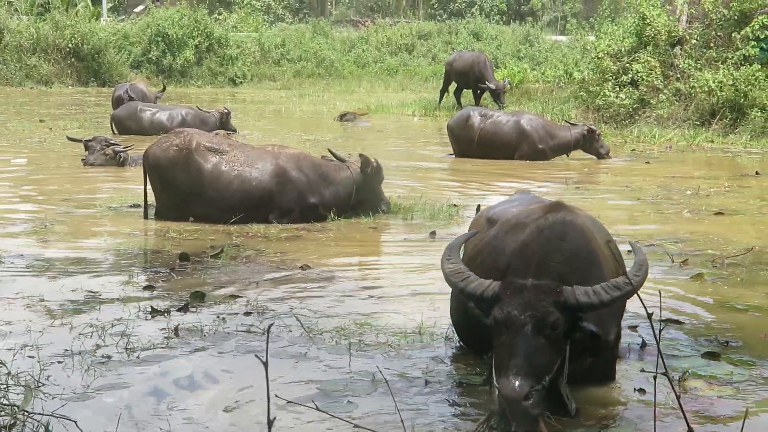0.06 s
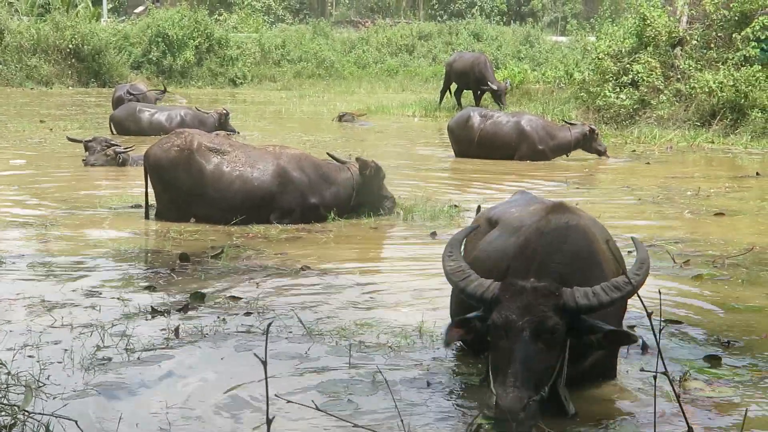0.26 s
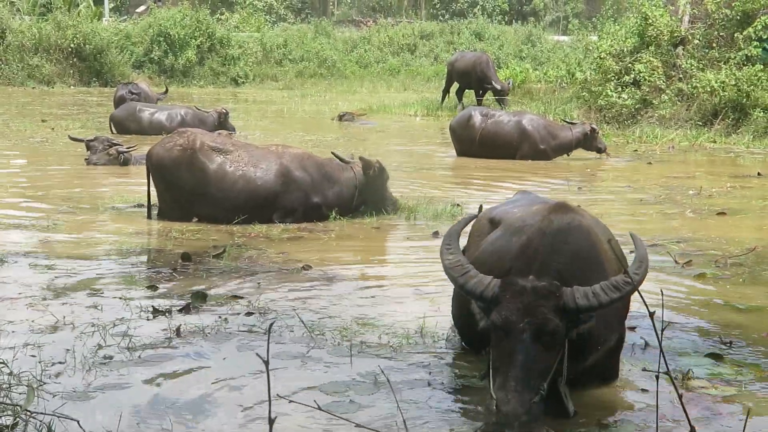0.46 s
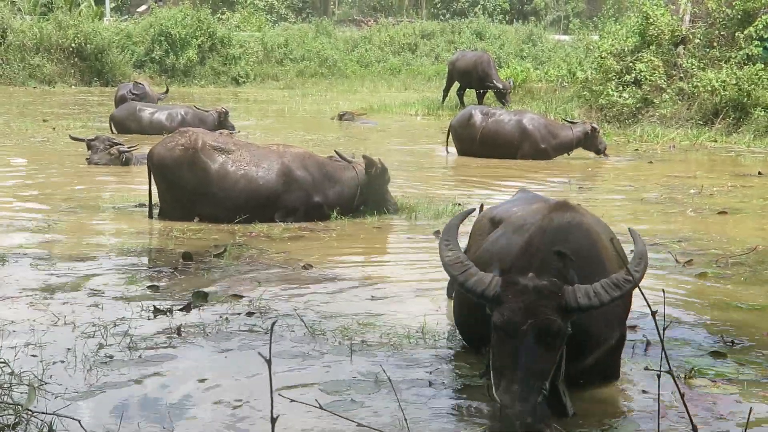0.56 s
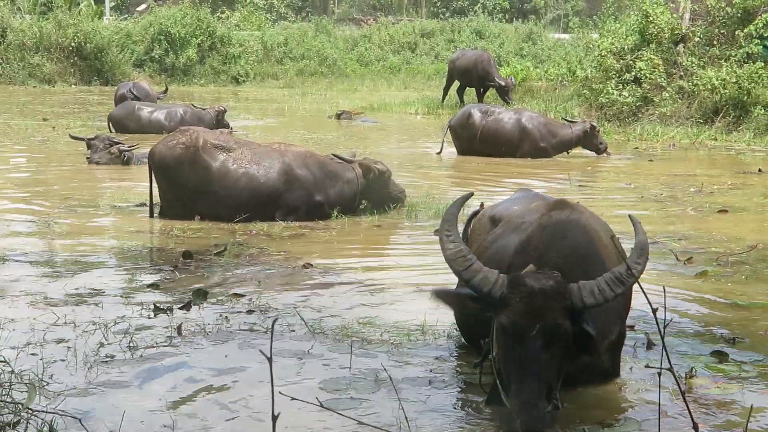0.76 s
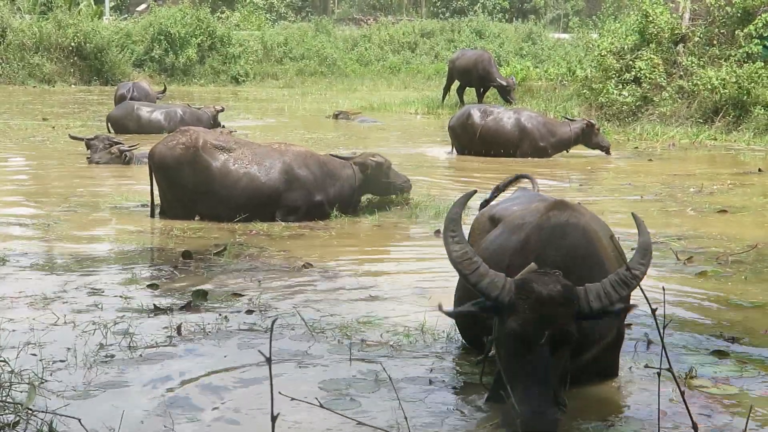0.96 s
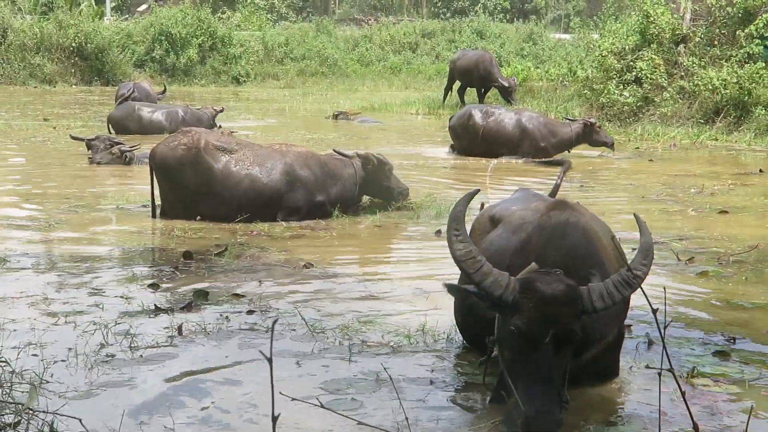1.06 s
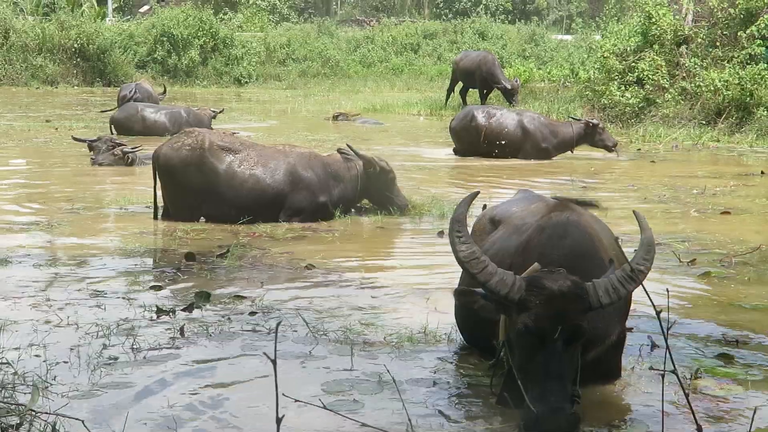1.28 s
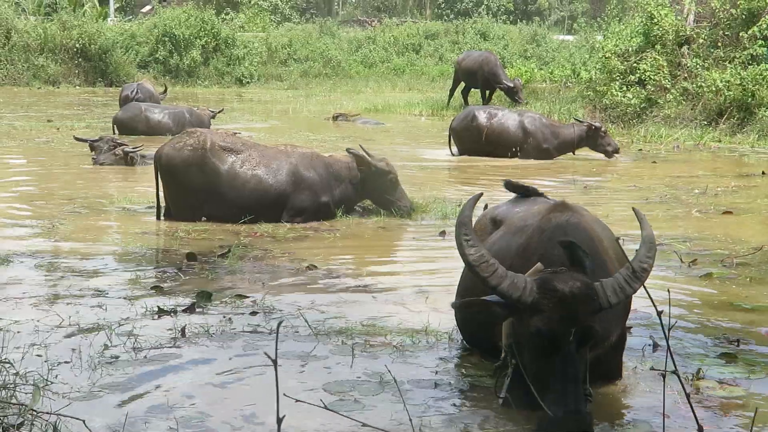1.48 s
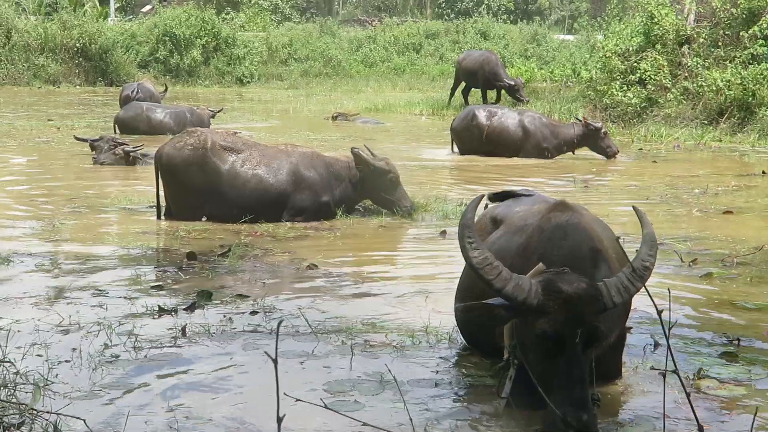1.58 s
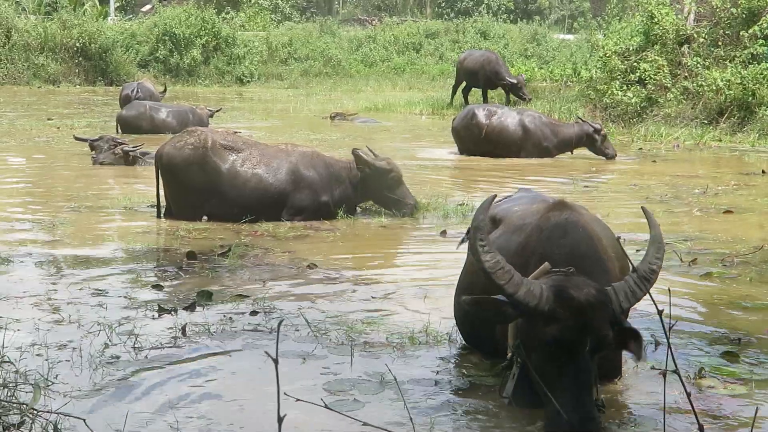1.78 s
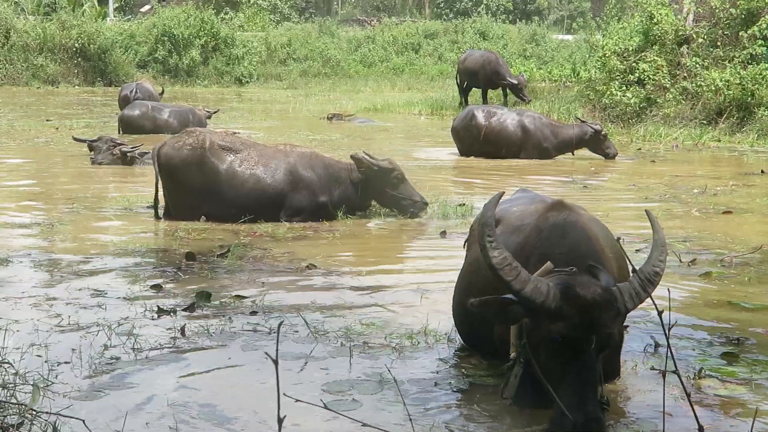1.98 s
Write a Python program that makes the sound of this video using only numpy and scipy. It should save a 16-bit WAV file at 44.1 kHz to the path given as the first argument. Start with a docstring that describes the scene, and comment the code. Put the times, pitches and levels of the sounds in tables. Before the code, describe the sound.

Buffaloes wade through shallow water, bubbling softly and then splashing, over low rumble and outdoor hiss.

```python
"""Water buffaloes wade and feed in a flooded field. From the start: low rumble, open-air hiss, a fine fizz
and small bubbles lapping at their legs. Wind puffs on the microphone's ports, a faint whistle passes,
drops and stalks snap and gentle waves wash in. A small piece of metal clinks close by, the microphone
takes a light knock, and wet grass swishes over two softer clinks. At about 1.5 s one animal plunges:
pockets of air ring in a double gulp, the water sloshes, and a spray is thrown."""
import sys
import numpy as np
from scipy import signal
from scipy.fft import rfft, irfft, next_fast_len
from scipy.io import wavfile
from scipy.ndimage import uniform_filter1d, map_coordinates

SR = 44100
rng = np.random.default_rng(int(sys.argv[2]) if len(sys.argv) > 2 else 0)


def transcribe(u):
    """Save the signal u as a 16-bit wav file named by the first command-line argument.

    u: samples, shape (n,) or (channels, n), limited to [-1, 1]; the rate is SR.
    q: integer samples, one column per channel.
    """
    v = np.clip(np.atleast_2d(u).T, -1, 1)
    q = np.round(v * 32767).astype(np.int16)
    wavfile.write(sys.argv[1], SR, q)


N = 89478


def amp(db):
    """Decibels to gain."""
    return 10 ** (np.asarray(db) / 20)


def unit(x):
    """Scale to rms 1."""
    return x / np.sqrt(np.mean(x ** 2) + 1e-20)


def along(points, hz):
    """Read a curve of (f/Hz, value) points on a log frequency axis."""
    f, values = np.transpose(points)
    return np.interp(np.log(hz + 1), np.log(f + 1), values)


def automation(rows):
    """One value per sample for each column after the time."""
    times, *columns = np.transpose(rows)
    return [np.interp(np.arange(N) / SR, times, column) for column in columns]


def wobble(rate):
    """A smooth random modulator, rate knots a second."""
    return map_coordinates(rng.standard_normal(2000), [np.arange(N) * rate / SR], mode="wrap")


def eq(x, response):
    """Filter x by a gain that depends on frequency."""
    size = next_fast_len(N + SR // 2)
    return irfft(rfft(x, size) * response(np.fft.rfftfreq(size, 1 / SR)), size)[..., :N]


def add(out, s, x):
    """Mix x into out from time s."""
    i = max(round(s * SR), 0)
    out[..., i:i + x.shape[-1]] += x[..., :max(N - i, 0)]


def stereo(pair, colour, image):
    """Two unrelated signals become left and right with a given EQ and correlation, rms 1."""
    def mid_side(hz):
        width = np.arccos(np.clip(along(image, hz), -1, 1)) / 2
        return amp(along(colour, hz)) * [np.cos(width), np.sin(width)]
    mid, side = eq(pair, mid_side)
    return unit(np.array([mid + side, mid - side]))


def patchy(depth_db):
    """Two noises with small random patches of gain in time and frequency."""
    spectra = signal.stft(rng.standard_normal((2, N)), nperseg=256)[2]
    patches = rng.standard_normal(spectra.shape[1:])
    patches = uniform_filter1d(uniform_filter1d(patches, 4, axis=0), 8, axis=1)
    return signal.istft(spectra * amp(depth_db * unit(patches)), nperseg=256)[1][:, :N]


def crackle(per_s, share):
    """Two noises with a share of their power in tiny separate ticks."""
    hits = (rng.random(N) < per_s / SR) * rng.standard_normal((2, N))
    return np.sqrt(share) * unit(hits) + np.sqrt(1 - share) * rng.standard_normal((2, N))


def envelope(rows):
    """Attack, hold and decay of each cue, summed in power."""
    t = np.arange(N) / SR
    cues = []
    for s, attack, hold, t60, db in rows:
        decay_db = 60 * np.maximum(t - s - attack - hold, 0) / t60
        cues.append(np.clip((t - s) / attack, 0, 1) * amp(db - decay_db))
    return np.linalg.norm(cues, axis=0)


RUMBLE_FADER = [(0.0, -28.5), (0.05, -37.5), (0.11, -29.5), (0.22, -38.5), (0.33, -31.5), (0.68, -34),
                (0.69, -37.5), (0.89, -32), (1.44, -34.5), (1.48, -37), (1.98, -39), (2.0, -38)]  # level ride: t/s, level/dB
RUMBLE_EQ = [(18, -44), (32, -35), (43, 0.5), (70, -2.5), (95, 3), (138, 0), (158, -4), (185, -20.5),
             (260, -49), (500, -77)]  # bass weight: f/Hz, level/dB
RUMBLE_IMAGE = [(30, .98), (80, .92), (160, .85)]  # nearly mono: f/Hz, L-R correlation
def rumble():
    """A bed of low noise, levelled and then ridden by the fader."""
    level_db, = automation(RUMBLE_FADER)
    low = stereo(rng.standard_normal((2, N)), RUMBLE_EQ, RUMBLE_IMAGE)
    power = uniform_filter1d(np.mean(low ** 2, axis=0), size=5000)
    return amp(level_db) * low / np.sqrt(np.abs(power))


AIR_MID_EQ = [(100, 2), (200, -1), (350, -1), (650, -6.5), (1150, -9), (1600, -12.5), (2300, -11),
              (4000, -14), (9000, -20), (12000, -22.5), (15800, -35.5)]  # hiss in the centre: f/Hz, level/dB
AIR_SIDE_EQ = [(25, -28), (80, -20), (200, -3), (330, -2), (650, -7), (1300, -15.5), (3000, -19.5),
               (8000, -19.5), (12000, -26), (15800, -35)]  # hiss at the sides: f/Hz, level/dB
def open_air(mid_db=-42.5, side_db=-43.5):
    """The wide, slightly restless hiss of the field."""
    mid, side = patchy(depth_db=1.07)
    mid = amp(mid_db) * unit(eq(mid, lambda hz: amp(along(AIR_MID_EQ, hz))))
    side = amp(side_db) * unit(eq(side, lambda hz: amp(along(AIR_SIDE_EQ, hz))))
    return np.array([mid + side, mid - side])


FIZZ_EQ = [(500, -11), (1800, 0), (4000, -2.5), (8000, -5), (12000, -11), (15800, -17)]  # fine grain: f/Hz, level/dB
WET_IMAGE = [(200, 0.7), (1000, 0.97), (3500, 1), (6000, 0.53), (14000, .25)]  # fizz and wet noises, wide on top: f/Hz, L-R correlation
def fine_fizz(level_db=-56):
    """A faint, fine fizz of tiny background ticks."""
    return amp(level_db) * stereo(crackle(per_s=420, share=1), FIZZ_EQ, WET_IMAGE)


def bubble(hz, swell, rise):
    """A bubble swells, rings and dies; its pitch climbs by the fraction rise per swell time."""
    t = np.arange(int(8 * swell * SR) + 2) / SR
    age = t / swell
    return age ** 2 * np.exp(2 * (1 - age)) * np.sin(2 * np.pi * hz * t * (1 + rise * age / 2))


LAP_FADER = [(0, -56.5), (.4, -48.5), (.8, -72), (1.1, -50.5), (1.45, -47), (1.65, -48.5), (1.88, -48),
             (2.03, -48.5)]  # level ride: t/s, level/dB
def lapping(per_s=700, centre_hz=1448, pitch_spread=0.6, pan_spread=0.14, swell_cycles=5.25):
    """Many small bubbles ring around the legs of the herd."""
    out = np.zeros((2, N))
    for _ in range(int(per_s * N / SR)):
        hz = centre_hz * np.exp(pitch_spread * np.clip(rng.standard_normal(), -2, 2))
        gain = amp(-2.5 * np.log(max(rng.random(), 0.03)))  # a few stand out
        pan = pan_spread * rng.standard_normal()
        ring = gain * bubble(hz, swell_cycles / hz, rise=0.032)
        add(out, rng.random() * N / SR, np.outer([1 + pan, 1 - pan], ring))
    level_db, = automation(LAP_FADER)
    return amp(level_db) * unit(out)


PUFF_CUES = [(.04, 0.023, .03, 0.19, -33.5), (.15, 0.011, 0.024, 0.57, -34.5),
             (.29, 0.017, 0.05, 0.35, -31)]  # gusts: t/s, attack/s, hold/s, t60/s, level/dB
PUFF_EQ = [(25, -34), (55, -12), (100, 0), (170, -6), (300, -25), (700, -60)]  # low thud: f/Hz, level/dB
def wind():
    """Wind buffets the microphone's ports, largely out of phase."""
    return envelope(PUFF_CUES) * stereo(rng.standard_normal((2, N)), PUFF_EQ, [(100, -0.67)])


WHISTLE_GLIDE = [(.13, 9500, -74), (.19, 10300, -60), (.25, 10850, -59), (.33, 10520, -56),
                 (.39, 10150, -62), (.45, 9600, -74)]  # lower tone: t/s, f/Hz, level/dB
def whistle(upper_ratio=1.197, upper_db=-2, waver_hz=110, flicker_db=3.5):
    """Two thin, wavering high tones rise and fall together, each flickering."""
    hz, level_db = automation(WHISTLE_GLIDE)

    def tone(ratio):
        flicker = amp(flicker_db * wobble(65.4))
        pitch = ratio * hz + waver_hz * wobble(400)
        return flicker * np.sin(2 * np.pi * np.cumsum(pitch) / SR)
    return amp(level_db) * (tone(1) + amp(upper_db) * tone(upper_ratio))


SNAP_CUES = [(0.257, -33, 7200, .3), (.467, -28.5, 8100, .3), (.772, -26, 8350, .3),
             (1.0005, -21.5, 7400, 0.52), (1.024, -22, 1420, 0.38), (1.063, -26, 4300, .6),
             (1.168, -25, 3750, 0.96), (1.228, -28, 7350, .2), (1.4406, -14.5, 7500, -0.48),
             (1.439, -22, 2240, .8), (1.6949, -14, 1190, 1), (1.7139, -16, 3050, 0.97),
             (1.726, -16.5, 4200, 0.52), (1.935, -31, 7000, .4), (2.01, -32, 6000, .5)]  # ticks: t/s, level/dB, f/Hz, L-R correlation
def snaps(t60=0.01, width_octaves=0.45):
    """Drops land and stalks snap: a few milliseconds of noise around one pitch."""
    out, t = np.zeros((2, N)), np.arange(2048) / SR
    f = np.fft.rfftfreq(len(t), 1 / SR) + 1
    for s, db, hz, correlation in SNAP_CUES:
        band = 1 / (1 + (np.log2(f / hz) / width_octaves) ** 2)
        mid, side = irfft(rfft(rng.standard_normal((2, len(t)))) * band)
        width = np.arccos(correlation) / 2
        pair = unit(np.cos(width) * mid + np.outer([1, -1], np.sin(width) * side))
        add(out, s, pair * amp(db - 60 * t / t60) / 2)
    return out


GULP_CUES = [(.259, 550, -36, 0.0078, 0.09), (1.062, 1180, -33, 0.0026, 0.03),
             (1.09, 1200, -39.5, 0.0049, 0.06), (1.299, 1128, -37.5, 0.0067, .04),
             (1.402, 930, -40.5, .003, 0.12), (1.416, 1380, -40, 0.0024, 0.12),
             (1.482, 260, -25.5, 0.0059, 0.05), (1.4835, 483, -21, 0.0081, 0.07),
             (1.490, 2173, -26.5, 0.0036, 0.03), (1.49, 1210, -26, 0.0064, .02),
             (1.5055, 857, -20.5, 0.0046, 0.06), (1.5094, 1165, -23.5, 0.00474, .04),
             (1.508, 2980, -32, 0.0022, 0), (1.644, 1950, -42.5, 0.003, 0.05),
             (1.757, 953, -40, 0.0057, 0.06), (1.853, 750, -42, 0.0068, 0), (1.894, 720, -38, 0.0017, .05)]  # single bubbles: t/s, f/Hz, level/dB, swell/s, pitch rise/fraction
def gulps(roughness=0.35):
    """Larger pockets of air close one by one, their ring shaken by the churning water."""
    out = np.zeros(N)
    for s, hz, db, swell, rise in GULP_CUES:
        add(out, s, amp(db) * bubble(hz, swell, rise))
    return out * (1 + roughness * wobble(500))


WASH_CUES = [(.29, 0.033, 0.21, 0.29, -51), (.49, 0.023, 0.17, 0.51, -48), (.63, 0.0089, 0.039, 0.24, -50),
             (.72, 0.017, .08, 0.39, -42.5), (.93, 0.0078, 0.097, 0.24, -43.5),
             (1.12, .03, 0.014, 0.23, -40.5), (1.285, 0.019, 0.023, 0.18, -48),
             (1.385, 0.044, 0.09, 0.26, -42), (1.83, 0.018, 0.063, 0.11, -47)]  # waves: t/s, attack/s, hold/s, t60/s, level/dB
WASH_EQ = [(200, -9), (450, 3.5), (700, -7.5), (950, 1.5), (1300, -3), (1600, -9.5), (2300, -4.5),
           (3500, -13.5), (6000, -11.5), (15800, -29)]  # hollow mids: f/Hz, level/dB
def wash():
    """Gentle waves wash round the legs in soft swells of mottled noise."""
    return envelope(WASH_CUES) * stereo(patchy(depth_db=2.5), WASH_EQ, WET_IMAGE)


CLINK_CUES = [(0.4101, -34), (.83, -42), (0.951, -46)]  # hits: t/s, level/dB
METAL_MODES = [(1111, -8, 0.79, 0.33), (1496, -13, 1, 0.49), (2685, -10, 1, 1.4), (2816, 0.5, .14, 0.86),
               (5950, -9, .13, 1.6), (6743, 1.5, 0.26, 2.35), (7625, -7.5, 0.43, 2.1),
               (10000, -9.5, 0.14, 1.6)]  # partials: f/Hz, level/dB, t60/s, left phase lead/rad
def metal(rattle_db=-3.5, rattle_t60=0.14):
    """A small piece of metal rattles briefly and rings, off to one side."""
    out, t = np.zeros((2, N)), np.arange(SR // 2) / SR
    for s, hit_db in CLINK_CUES:
        for hz, mode_db, t60, lead in METAL_MODES:
            phase = 2 * np.pi * (hz * t + rng.random()) + np.array([[lead], [-lead]]) / 2
            ring = amp(-60 * t / t60) * np.sin(phase)
            rattle = amp(rattle_db - 60 * t / rattle_t60) * wobble(690)[:len(t)] * np.cos(phase)
            add(out, s, amp(hit_db + mode_db) * (ring + rattle))
    return out


BUMP_CUES = [(.506, 0.00082, 0.0034, 0.04, -30.5)]  # knock: t/s, attack/s, hold/s, t60/s, level/dB
BUMP_EQ = [(200, -7), (700, -2), (1500, 6), (3000, -1), (6000, -11), (15000, -36)]  # midrange click: f/Hz, level/dB
def bump():
    """A light knock on the microphone's body pushes the two ports in opposite ways."""
    return envelope(BUMP_CUES) * stereo(rng.standard_normal((2, N)), BUMP_EQ, [(1000, -0.63)])


SWISH_CUES = [(0.77, 0.031, 0.023, 0.51, -38.5, 7500), (0.819, 0.0045, 0.0045, 0.038, -28.5, 7000),
              (0.94, 0.01, 0.022, .16, -38.5, 9440), (0.995, 0.0024, 0.0042, 0.2, -37.5, 7600),
              (1.438, .002, .004, 0.17, -37.5, 8700), (1.486, 0.014, .05, 0.07, -45, 6900)]  # swishes: t/s, attack/s, hold/s, t60/s, level/dB, centre f/Hz
SWISH_EQ = [(.08, -11), (.28, -10.5), (.65, -9), (.85, -0.5), (1, 0), (1.2, -3), (1.549, -11), (2.2, -17)]  # bright peak: f/centre, level/dB
def grass():
    """Each swish of wet blades is a grainy hiss with its own brightness."""
    out = np.zeros((2, N))
    for *cue, hz in SWISH_CUES:
        colour = [(multiple * hz, db) for multiple, db in SWISH_EQ]
        out += envelope([cue]) * stereo(crackle(per_s=2700, share=0.3), colour, WET_IMAGE)
    return out


SLOSH_CUES = [(1.15, 0.013, .004, 0.17, -44.5), (1.480, 0.003, 0.024, 0.098, -34),
              (1.507, 0.0023, .006, .06, -33.5), (1.522, 0.0072, 0.019, 0.21, -34),
              (1.674, 0.0084, 0.014, .1, -40)]  # surges: t/s, attack/s, hold/s, t60/s, level/dB
SLOSH_EQ = [(100, -17), (250, -2), (700, -11), (1200, -0.5), (3400, -1), (5000, -9.5), (9000, -19),
            (15800, -30)]  # body and splash: f/Hz, level/dB
def slosh():
    """Water sloshes in short showers of tiny impacts."""
    return envelope(SLOSH_CUES) * stereo(crackle(per_s=4000, share=0.37), SLOSH_EQ, WET_IMAGE)


SPRAY_CUES = [(1.704, .008, 0.015, 0.14, -29)]  # throw: t/s, attack/s, hold/s, t60/s, level/dB
SPRAY_EQ = [(80, -31), (220, 8), (500, -1.5), (1500, -5.5), (3800, -3.5), (7000, -6), (11000, -8),
            (15800, -17)]  # low slap, open top: f/Hz, level/dB
def spray():
    """Thrown water lands in one dense patter."""
    return envelope(SPRAY_CUES) * stereo(crackle(per_s=3500, share=0.42), SPRAY_EQ, WET_IMAGE)


def bank_scatter(x, return_db=-14, t60=0.18, predelay_s=0.0056):
    """A short, weak reverb off the water and the bushes on the bank."""
    t = np.arange(SR // 3) / SR
    fade_in = np.clip(t / predelay_s - 1, 0, 1)
    tail = rng.standard_normal((2, len(t))) * amp(-60 * t / t60) * fade_in
    return amp(return_db) * signal.fftconvolve(x, tail / np.linalg.norm(tail[0]), axes=1)[:, :N]


BALANCE = [(90, 0.1), (250, -1.8), (1500, -0.2), (3500, -0.2), (7000, 2.5), (15000, 2.5)]  # stereo tilt: f/Hz, left minus right level/dB
def scene():
    """The mix: only the wet bus feeds the reverb, and the treble leans left."""
    wet = fine_fizz() + lapping() + snaps() + gulps() + wash() + grass() + slosh() + spray()
    mix = rumble() + open_air() + wind() + whistle() + metal() + bump() + wet + bank_scatter(wet)
    return eq(mix, lambda hz: amp(np.outer([0.5, -0.5], along(BALANCE, hz))))


def record(dry, top_hz=15850):
    """A brick-wall low-pass on the master."""
    return eq(dry, lambda hz: hz < top_hz)


dry = scene()
out = record(dry)
transcribe(out)
```